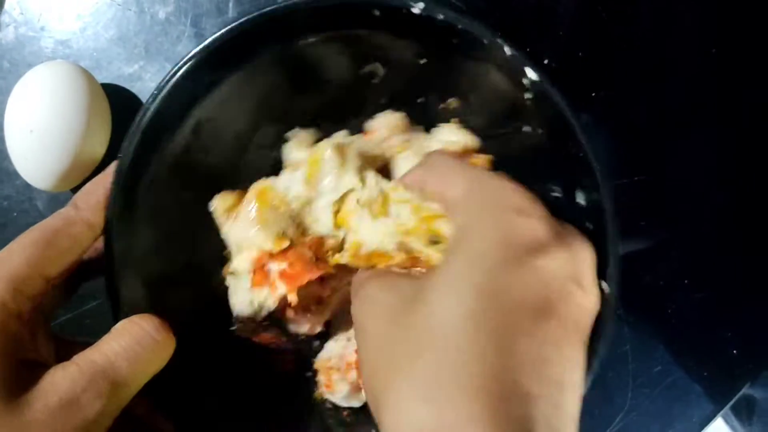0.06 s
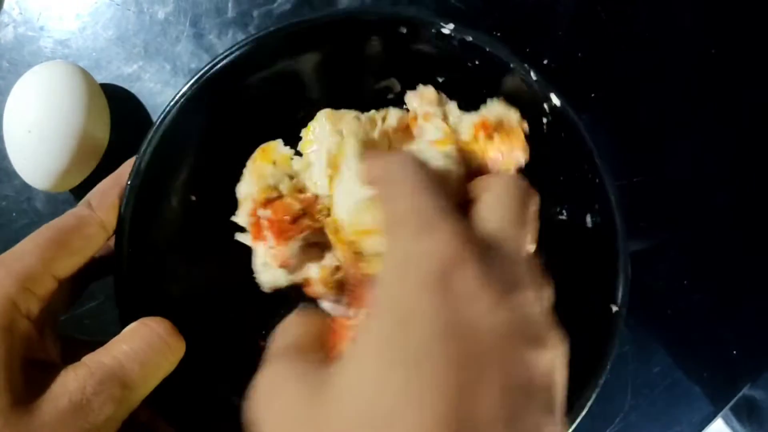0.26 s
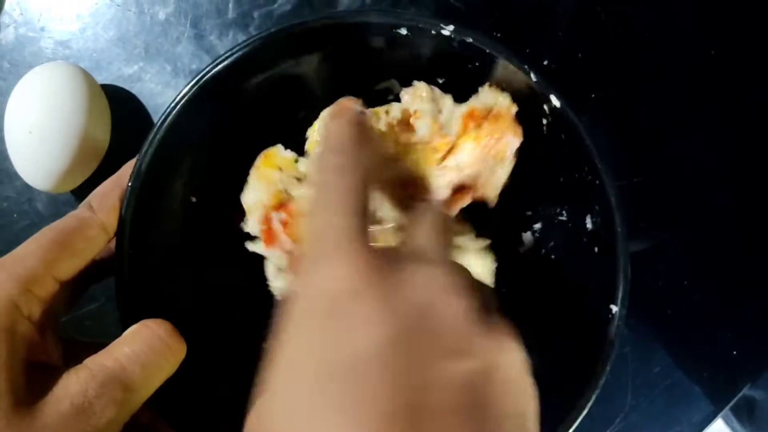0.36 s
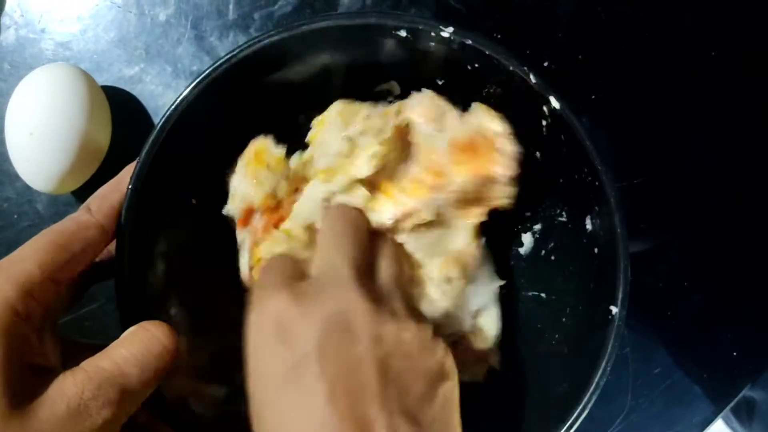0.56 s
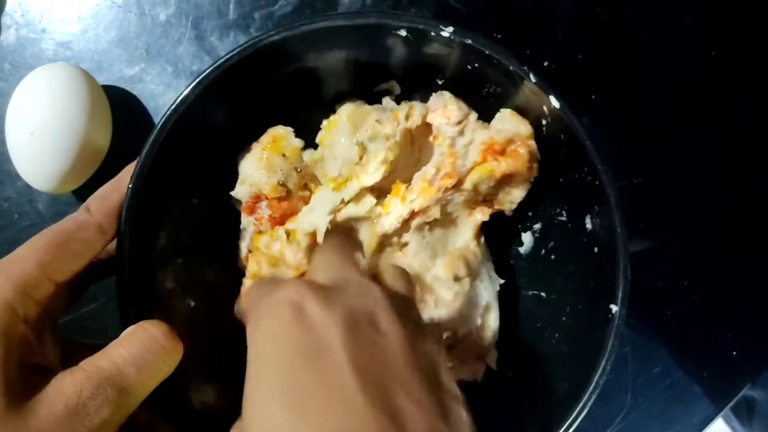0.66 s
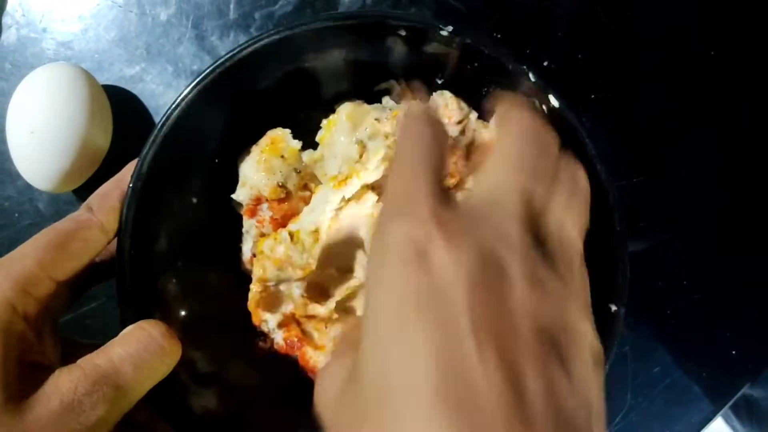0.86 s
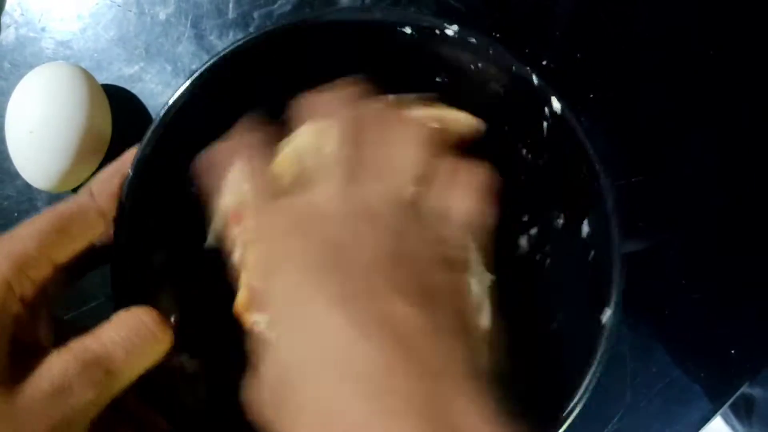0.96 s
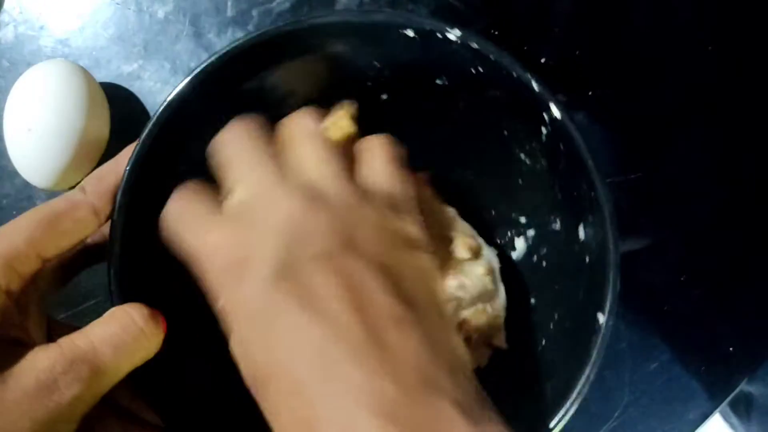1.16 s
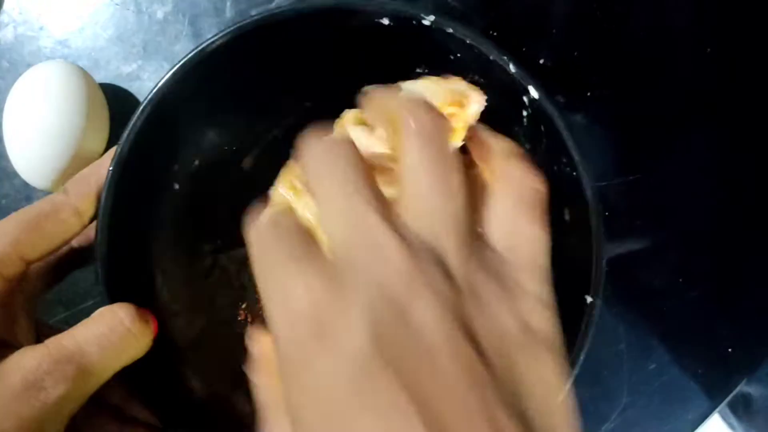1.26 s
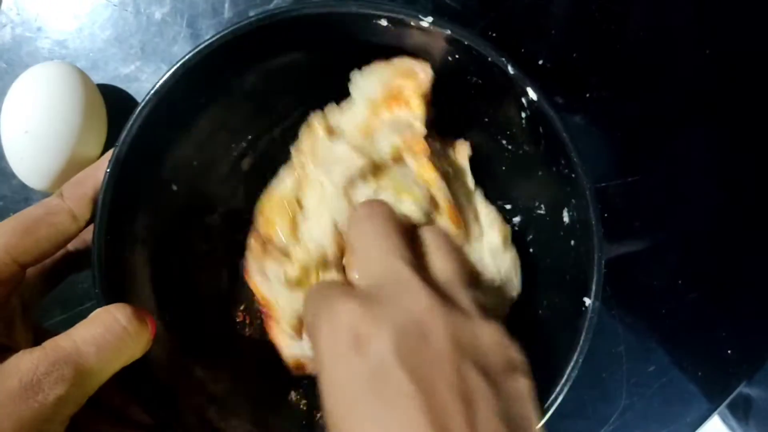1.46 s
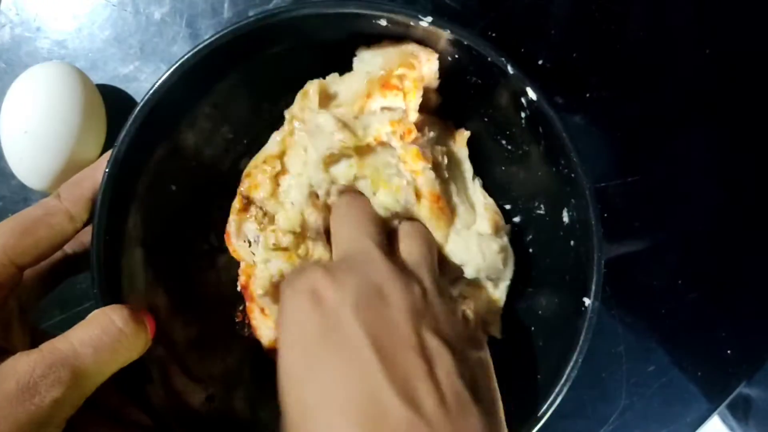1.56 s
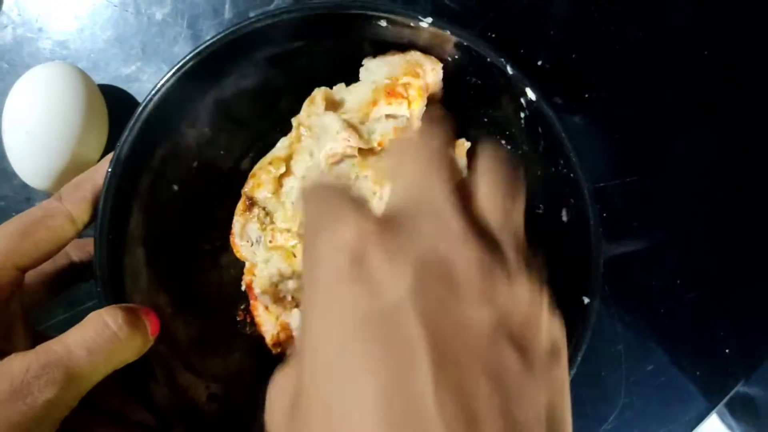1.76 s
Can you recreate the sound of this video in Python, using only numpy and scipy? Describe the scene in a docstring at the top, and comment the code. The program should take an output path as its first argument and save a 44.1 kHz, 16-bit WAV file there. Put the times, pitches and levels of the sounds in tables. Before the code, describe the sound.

Wet minced meat squelches close to the microphone as a hand kneads it, with sticky crackles and small air pops. The bowl knocks sharply on the counter twice early on, then once softly, in a small kitchen.

```python
"""Wet minced meat is kneaded by hand in a bowl on a kitchen counter, close to the microphone.
Its sticky films rupture in a fine crackle, air pockets pop and the lump thuds softly under the hand.
The bowl skids and knocks on the counter, twice hard and once softly: friction gives a train of slips,
and each impact excites heavily damped modes. The small room answers with reverberation and standing
waves, over a quiet rumble."""
import sys
import numpy as np
from scipy import signal
from scipy.fft import rfft, irfft, next_fast_len
from scipy.io import wavfile
from scipy.ndimage import uniform_filter1d, minimum_filter1d

SR = 44100
rng = np.random.default_rng(int(sys.argv[2]) if len(sys.argv) > 2 else 0)


def generate_wav(sig):
    """Save sig (samples, or channels by samples) to the path in sys.argv[1] as 16-bit PCM at SR."""
    pcm = np.round(np.clip(np.atleast_2d(sig).T, -1, 1) * 32767).astype(np.int16)
    wavfile.write(sys.argv[1], SR, pcm)


N = 79380
TIME = np.arange(N) / SR

# Envelopes of the kneading, one list per stroke: time_s, crackle_db, squish_db, sparkle_db (all relative)
KNEADING_STROKES = [
    [(0.0, -51, -63, -77), (0.074, -56, -59, -71), (0.098, -55, -55.5, -65), (0.19, -47, -59.5, -72),
     (0.215, -57, -78, -93)],
    [(0.58, -72.5, -70.5, -81), (0.62, -52.5, -61.5, -67), (0.71, -64.5, -73, -80.5),
     (0.754, -51, -67.5, -57), (0.8, -79.5, -81, -97), (0.93, -99, -89, -103)],
    [(0.955, -61.5, -72, -84.5), (1.004, -65, -67.5, -74), (1.04, -53, -53.5, -73.5)],
    [(1.2, -62, -63.5, -72), (1.25, -53, -62, -72), (1.263, -52, -50, -60.5), (1.275, -53, -59.5, -67),
     (1.308, -45, -56, -58), (1.4, -68.5, -89, -100)],
    [(1.5, -65, -63.5, -88), (1.555, -65, -67.5, -78), (1.568, -49.5, -60, -73.5),
     (1.668, -63.5, -77.5, -77), (1.722, -61.5, -71, -69), (1.73, -47, -67, -66.5),
     (1.745, -57.5, -71.5, -76), (1.8, -58.5, -57, -76)],
]
# Spectra of the bright crackle (ringing at the microphone's resonance), the fine sparkle and
# the wet squish: frequency_hz, level_db
CRACKLE_SPECTRUM = [(100, -64), (700, -50.5), (2000, -27), (3000, -23.5), (5200, -5), (6800, -0.5),
                    (7700, 15.5), (9300, 0), (10400, -15), (15500, -39.5)]
SPARKLE_SPECTRUM = [(3000, -43.5), (7000, -1), (9000, 3), (11000, -13.5), (15500, -15.5)]
SQUISH_SPECTRUM = [(60, -68), (250, -13), (500, -17), (950, 0.5), (1500, -7.5), (2200, -9.5), (3000, -7.5),
                   (4500, -8.5), (7000, -8), (15000, -33.5)]
def tearing_paste():
    """Film rupture: sticky films crackle, the thinnest sparkle, and the wet mass squishes lower down."""
    time_s, *levels = np.vstack(KNEADING_STROKES).T
    crackle_db, squish_db, sparkle_db = [np.interp(TIME, time_s, level) for level in levels]
    crackle = from_db(crackle_db - 0.5) * snaps(CRACKLE_SPECTRUM, per_s=1700, spread_db=3.2, spots=6)
    sparkle = from_db(sparkle_db + 14) * snaps(SPARKLE_SPECTRUM, per_s=1200, spread_db=-1, spots=3)
    squish = from_db(squish_db + 0.5) * snaps(SQUISH_SPECTRUM, per_s=810, spread_db=-1.5, spots=6)
    return crackle + sparkle + squish


def snaps(spectrum, per_s, spread_db, spots):
    """Shot noise: random impulses from several spots, swelling in clumps, add up to a texture of rms 1."""
    clump_s, clump_db = 0.005, 2.5
    out = 0
    for _ in range(spots):
        occurs = rng.random(N) < per_s / spots / SR
        clump = np.interp(TIME / clump_s, np.arange(N), rng.standard_normal(N))
        size_db = spread_db * np.minimum(rng.exponential(1, N), 3) + clump_db * clump
        impulses = occurs * from_db(size_db) * rng.choice([-1, 1], N)
        out = out + paste_spot(impulses, spectrum)
    return unit_rms(out)


PASTE_PAN_DB, PASTE_LAG_MS = -2, 0.43
def paste_spot(impulses, spectrum, unit_peak=False):
    """Source and filter: each spot in the paste gives its impulses their own pitch, colour and position."""
    hz = np.geomspace(60, 16000, 40)
    pitch_shift = np.exp(0.045 * rng.standard_normal())
    level_db = at_hz(spectrum, hz * pitch_shift) + 2 * rng.standard_normal(len(hz))
    pan, lag = rng.standard_normal(2)
    sound = colour(impulses, np.column_stack([hz, level_db]), unit_peak)
    return place(sound, PASTE_PAN_DB + 3 * pan, PASTE_LAG_MS + 0.1 * lag)


# Air pockets bursting in the paste: start_s, level_db, body_relative_db
AIR_POCKETS = [(.0432, -27.5, -16), (.0932, -34, -14), (.1365, -34, -16), (.1668, -28.5, -13),
               (.1885, -34, -10), (.2115, -34, -16), (.4205, -34, -18), (.7358, -27, -24),
               (.7400, -31, -24), (.7528, -29, -22), (.7705, -33, -22), (.9460, -46, -10),
               (1.2465, -30, -16), (1.2550, -31, -16), (1.2595, -29, -14), (1.2852, -24, -1),
               (1.2925, -27, -16), (1.3038, -29, -18), (1.3790, -36, -16), (1.5040, -34, -7),
               (1.5095, -42, -4), (1.5645, -31, -13), (1.6195, -32, -20), (1.7022, -39, -20),
               (1.7280, -31, -24), (1.7392, -33, -12), (1.7665, -33, -18), (1.7905, -34, -7)]
# Spectra of the bright snap and the wet body of a pop: frequency_hz, level_db
SNAP_SPECTRUM = [(300, -60), (2000, -34), (6500, -13), (7800, 0), (9400, -9), (10600, -22), (15500, -27)]
BODY_SPECTRUM = [(80, -36), (400, -23.5), (1000, 2.5), (2000, -7.5), (4200, 3.5), (6000, 3), (12000, -41)]
def air_pops():
    """Pressure release: a pocket opens with a snap and a wet body, then closes with a smaller snap."""
    out = 0
    for start_s, level_db, body_relative_db in AIR_POCKETS:
        close_s = start_s + 0.0012 * rng.uniform(0.37, 1)
        pair = clicks([start_s, close_s], from_db([level_db, level_db - 5]))
        bright = paste_spot(pair, SNAP_SPECTRUM, unit_peak=True)
        burst = clicks([start_s], from_db([level_db + body_relative_db]))
        body = colour(burst, BODY_SPECTRUM, unit_peak=True)
        out = out + bright + place(body, PASTE_PAN_DB, PASTE_LAG_MS)
    return out


# Envelope of the hand pressing the lump against the bowl: time_s, relative_db
HAND_PRESSES = [(0, -51.5), (.07, -69.5), (.57, -79.5), (.64, -55.5), (.71, -63), (.78, -58), (.9, -82),
                (.97, -58.5), (1.2, -69), (1.33, -66.5), (1.52, -74.5), (1.65, -59.5), (1.8, -72.5)]
# Spectrum of the rubbing lump: frequency_hz, level_db
RUB_SPECTRUM = [(40, -24.5), (130, -9.5), (187, 2), (225, -14), (268, 0.5), (340, -13.5), (800, -14.5),
                (2000, -39)]
def lump_rubbing():
    """Friction noise: a low rub swells into a soft thud as the hand presses the lump."""
    level_db = np.interp(TIME, *np.transpose(HAND_PRESSES)) - 2.5
    return from_db(level_db) * stereo_noise(RUB_SPECTRUM, width=0.4)


# Impacts that ring the bowl: its knocks on the counter, and the lump landing heavily just before the soft
# knock: start_s, level_db, contact_ms
BOWL_IMPACTS = [(0.2259, 0.5, 0.26), (0.2997, -2, 0.13), (1.0494, -14.5, 3.24), (1.0548, -10.5, 0.58)]
# Modes of the loaded bowl: pitch_hz, level_db
BOWL_MODES = [(240, -21.5), (430, -13), (592, -12.5), (760, -4.5), (915, -1), (1125, -7.5), (1350, -14),
              (2100, -19.5), (2750, -17.5), (3560, -14)]
def bowl_knocks():
    """Modal vibration: impacts ring modes damped by paste and hand; a longer contact sounds duller."""
    t60_s, spread_db = 0.017, 1.5
    out = np.zeros(N)
    for start_s, level_db, contact_ms in BOWL_IMPACTS:
        age = np.maximum(TIME - start_s, 0)
        ring = 0
        for k, (pitch_hz, mode_db) in enumerate(BOWL_MODES):
            decay = from_db(mode_db + spread_db * rng.standard_normal() - 60 * age / t60_s)
            ring += (-1) ** k * decay * np.sin(2 * np.pi * pitch_hz * age)  # neighbours in antiphase
        push = signal.windows.hann(max(int(contact_ms * SR / 1000), 3))
        out += from_db(level_db) * signal.lfilter(push / push.sum(), 1, ring)
    return high_pass(out, order=4, cutoff_hz=150)  # the knocks carry no deep bass


# Landings of the bowl's hard foot: start_s, level_db
FOOT_LANDINGS = [(.2273, -0.5), (.2995, -3.5), (.3007, -13)]
# Skids of the foot on the counter: start_s, end_s, start_db, end_db
FOOT_SKIDS = [(.2226, .2282, -27, -11), (.2995, .3024, -7, -25)]
# Spectrum of the clack: frequency_hz, level_db
FOOT_SPECTRUM = [(60, -61.5), (300, -29), (900, -9.5), (2000, -4), (3500, -8), (5200, -5.5), (6800, -1.5),
                 (8000, -1.5), (9200, -7.5), (10600, -20), (12500, -36)]
def foot_clacks():
    """Stick-slip friction and impact: the foot skids in a run of tiny slips and clacks as it lands."""
    slips_per_s = 6000
    grip = sum(from_db(np.interp(TIME, [start_s, end_s], [start_db, end_db], -np.inf, -np.inf))
               for start_s, end_s, start_db, end_db in FOOT_SKIDS)
    slips = grip * (rng.random(N) < slips_per_s / SR) * rng.choice([-1, 1], N)
    skid = high_pass(slips + 1e-18, order=2, cutoff_hz=4500)
    start_s, level_db = np.transpose(FOOT_LANDINGS)
    return colour(clicks(start_s, from_db(level_db)) + skid, FOOT_SPECTRUM, unit_peak=True)


# Reverberation time of the kitchen: frequency_hz, t60_s
REVERB_TIMES = [(150, .45), (300, .38), (900, .33), (3000, .34), (8000, .3), (15000, .22)]
# Strength of its reverberation: frequency_hz, level_db
REVERB_LEVELS = [(100, 3.5), (250, 5), (500, -2), (950, -2), (2000, -0.5), (4000, -10.5), (8000, -12),
                 (15000, -12)]
def kitchen_reverb(x):
    """Diffuse field: reflections decay band by band, coherent at the two microphone ports in the bass."""
    gap_s, build_s, port_spacing_m, sound_m_per_s = 0.0012, 0.00089, 0.21, 343
    t, hz = TIME[:SR // 2], np.arange(SR // 4 + 1) * 2
    centres = np.geomspace(70, 16000, 20)
    mid, side = rfft(rng.standard_normal((2, len(t))))
    coherence = np.sinc(2 * hz * port_spacing_m / sound_m_per_s)
    white = np.sqrt(1 + coherence) * mid + np.sqrt(1 - coherence) * side * [[1], [-1]]
    onset = np.clip((t - gap_s) / build_s, 0, 1)
    response = 0
    for centre, weights in zip(centres, np.eye(len(centres))):
        band = at_hz(np.column_stack([centres, weights]), hz)
        tail = irfft(white * band) * onset * from_db(-60 * t / at_hz(REVERB_TIMES, centre))
        tail *= np.sqrt(np.mean(band ** 2) / np.sum(tail ** 2, axis=1, keepdims=True))
        response = response + tail * from_db(at_hz(REVERB_LEVELS, centre))
    return signal.fftconvolve(x[None], response, axes=1)[:, :N]


# Modes of the air between the walls: pitch_hz, gain_db, t60_s
STANDING_WAVES = [(124, 12, .6), (192, 16, .5), (261, 14, .42)]
def room_boom(knocks):
    """Resonance: standing waves between the walls hum on after each knock."""
    out = 0
    for pitch_hz, gain_db, t60_s in STANDING_WAVES:
        radius = from_db(-60 / (t60_s * SR))
        feedback = [1, -2 * radius * np.cos(2 * np.pi * pitch_hz / SR), radius ** 2]
        out = out + from_db(gain_db) * signal.lfilter([1 - radius, 0, radius - 1], feedback, knocks)
    return out


# Spectrum of the background: frequency_hz, level_db
RUMBLE_SPECTRUM = [(15, 3), (30, -12), (60, -7.5), (120, -19), (300, -18), (1000, -31), (3000, -47),
                   (8000, -52), (11000, -57.5), (16000, -48.5)]
def background_rumble():
    """Stationary noise: a quiet, steady rumble lies under the scene."""
    return from_db(-58.5) * stereo_noise(RUMBLE_SPECTRUM, width=0.6)


def from_db(db):
    """Amplitude ratio of a level in decibels."""
    return 10 ** (np.asarray(db) / 20)


def unit_rms(x):
    """Normalisation to unit power."""
    return x / np.sqrt(np.mean(x ** 2) + 1e-20)


def at_hz(points, hz):
    """Interpolation of a table on a log-frequency axis."""
    frequency_hz, value = np.transpose(points)
    return np.interp(np.log(np.maximum(hz, 1)), np.log(frequency_hz), value)


def colour(x, spectrum, unit_peak=False):
    """Minimum-phase filtering to a spectrum; with unit_peak a unit click comes out with height 1."""
    size = 2 * (next_fast_len(N + SR // 2) // 2)
    hz = np.arange(size // 2 + 1) * SR / size
    cepstrum = irfft(np.log(from_db(at_hz(spectrum, hz))))
    cepstrum[1:size // 2] *= 2  # folding onto positive time makes the filter causal
    cepstrum[size // 2 + 1:] = 0
    response = np.exp(rfft(cepstrum))
    if unit_peak:
        response /= np.abs(irfft(response)).max()
    return irfft(rfft(x, size) * response)[..., :N]


def high_pass(x, order, cutoff_hz):
    """Maximally flat high-pass filtering."""
    return signal.sosfilt(signal.butter(order, cutoff_hz, "high", fs=SR, output="sos"), x)


def clicks(times_s, gains):
    """Impulse excitation at the given times."""
    samples = np.round(np.asarray(times_s) * SR).astype(int)
    return np.bincount(np.clip(samples, 0, N - 1), gains, N)


def place(x, pan_db, lag_ms):
    """Localisation by level and time difference: pan_db is left minus right, lag_ms delays the left."""
    delayed = np.interp(TIME - lag_ms / 1000, TIME, x)
    return np.array([delayed * from_db(pan_db / 2), x * from_db(-pan_db / 2)])


def stereo_noise(spectrum, width):
    """Partial coherence: coloured noise of rms 1, partly shared by both sides."""
    mid, side = colour(rng.standard_normal((2, N)), spectrum)
    return unit_rms(np.array([mid + width * side, mid - width * side]))


def scene():
    """Superposition: paste and bowl, to the right, add to the room's response and the rumble."""
    paste = tearing_paste() + air_pops()
    knocks, clacks = bowl_knocks(), foot_clacks()
    bowl = place(knocks, pan_db=-9.5, lag_ms=0.19) + place(clacks, pan_db=-9, lag_ms=PASTE_LAG_MS)
    rubbing = lump_rubbing()
    room = kitchen_reverb(paste[1] + knocks + clacks) + room_boom(knocks)
    return paste + rubbing + bowl + room + background_rumble()


# Sensitivity difference of the two microphone ports: frequency_hz, left_minus_right_db
PORT_BALANCE = [(40, 0), (250, 4), (600, 6.5), (1200, 2.5), (2500, 0.5), (4500, -5), (8000, -6),
                (11500, 3.5)]
def record(dry):
    """Transduction: each port colours the sound, a fast limiter holds the peaks and the top is cut."""
    ceiling, reaction_s, cutoff_hz = 0.93, 0.00073, 15800
    ports = np.array([colour(x, [(hz, side * db / 2) for hz, db in PORT_BALANCE])
                      for x, side in zip(dry, (1, -1))])
    size = int(reaction_s * SR)
    needed = np.minimum(1, ceiling / (np.abs(ports) + 1e-9))
    held = minimum_filter1d(needed, 2 * size)
    gain = uniform_filter1d(uniform_filter1d(held, size), size)
    return signal.sosfilt(signal.ellip(10, 0.1, 70, cutoff_hz, fs=SR, output="sos"), ports * gain)


dry = scene()
out = record(dry)
generate_wav(out)
```